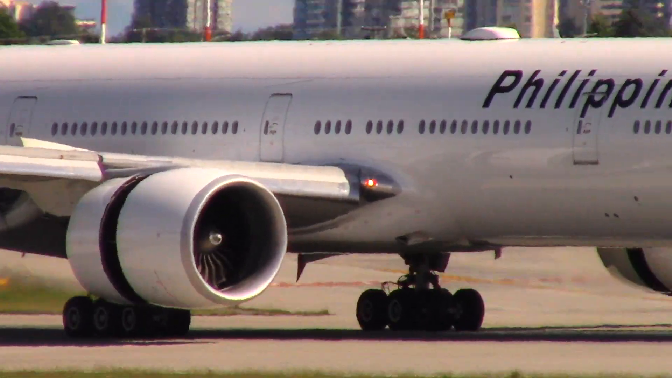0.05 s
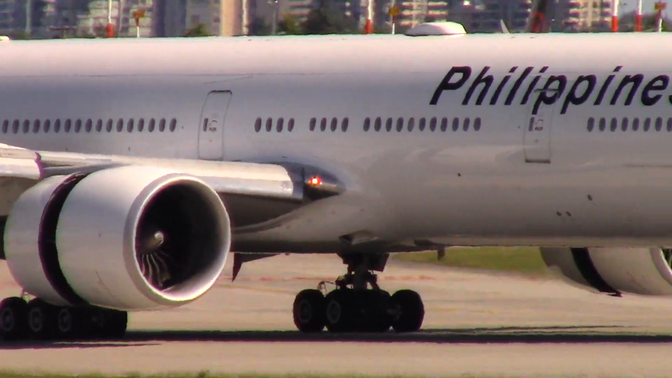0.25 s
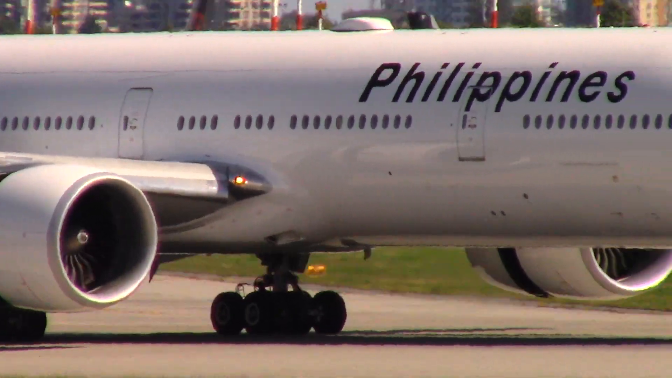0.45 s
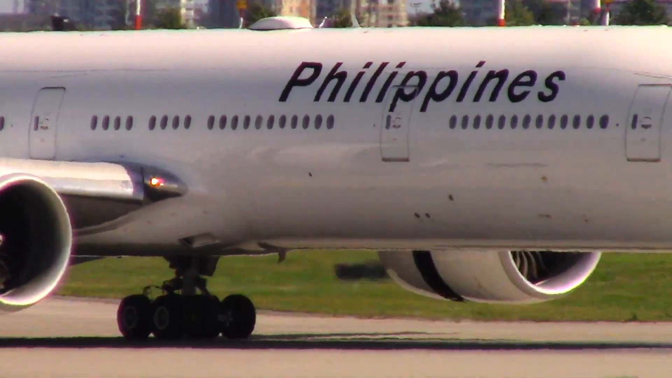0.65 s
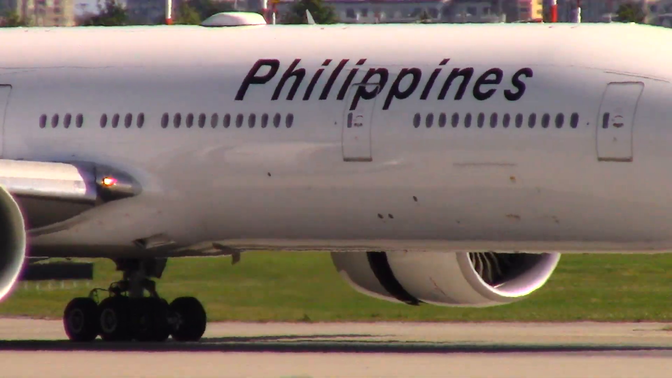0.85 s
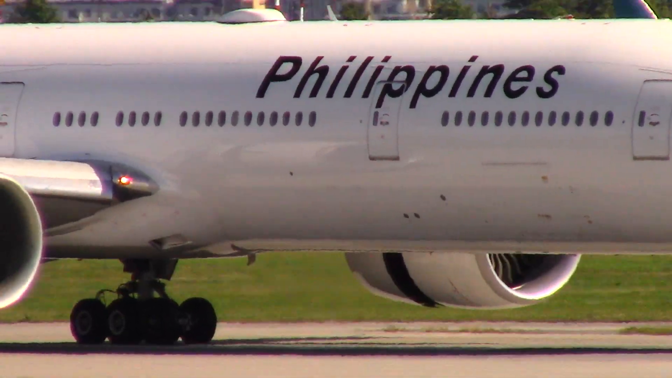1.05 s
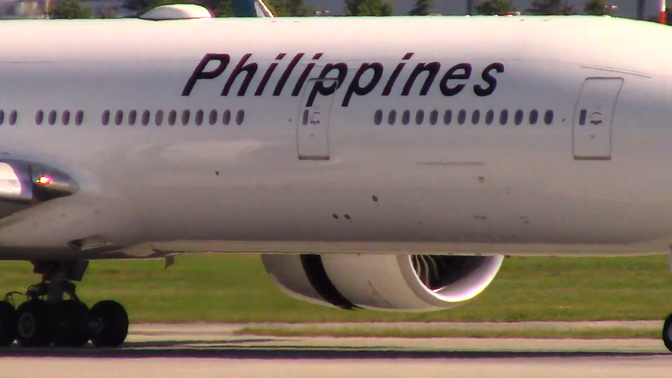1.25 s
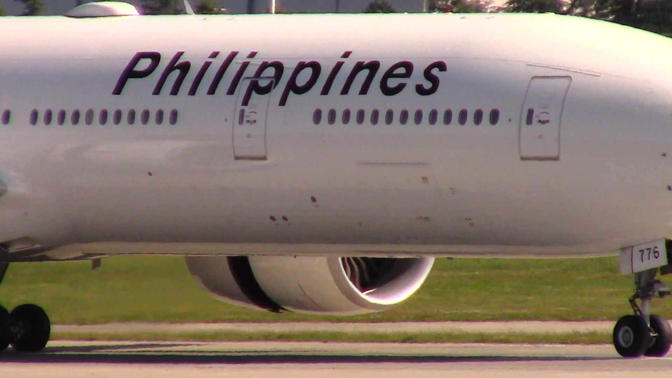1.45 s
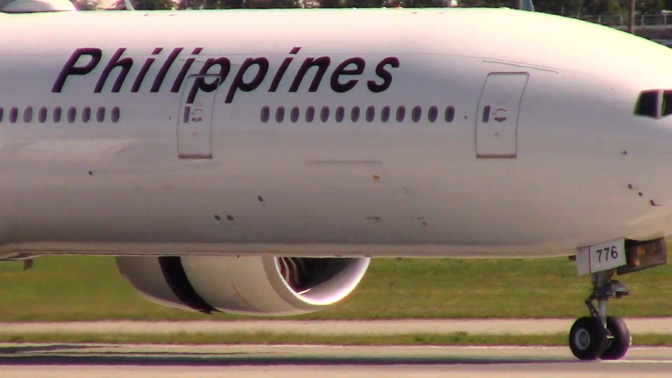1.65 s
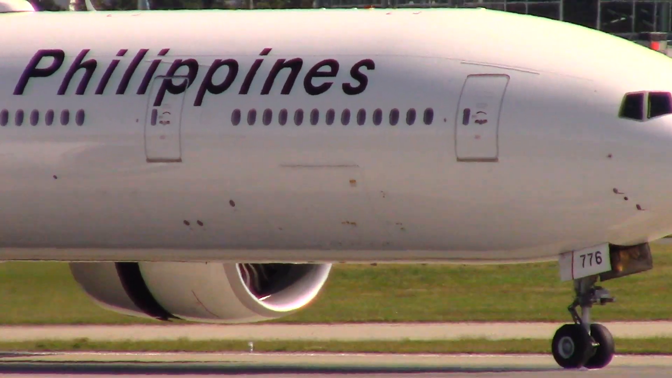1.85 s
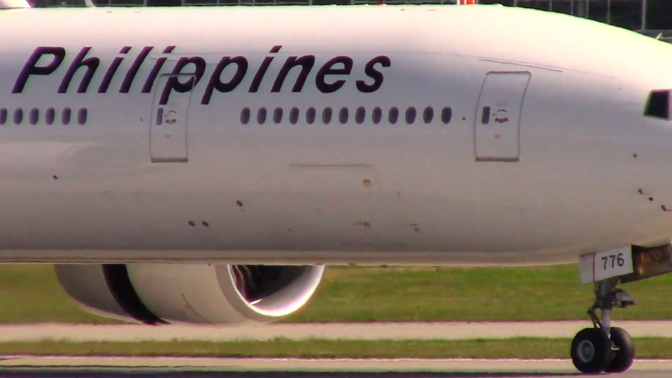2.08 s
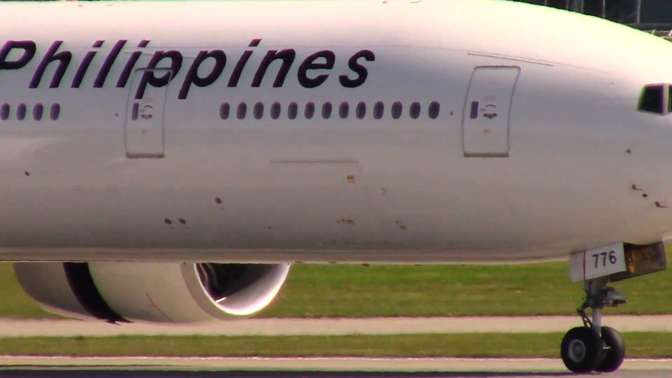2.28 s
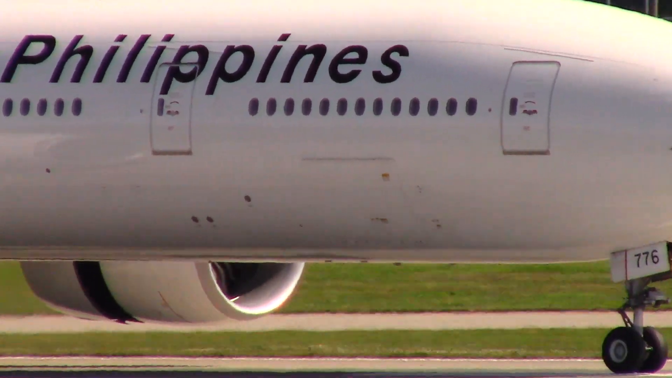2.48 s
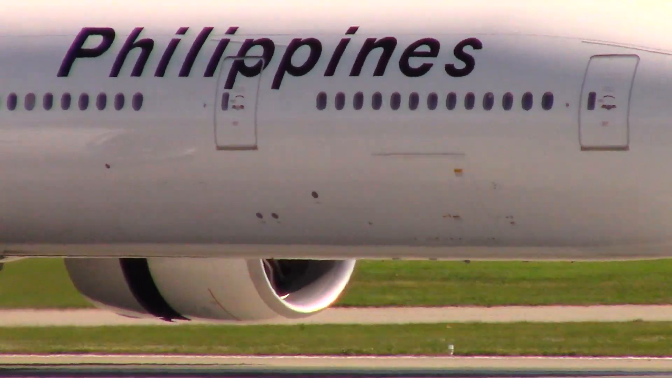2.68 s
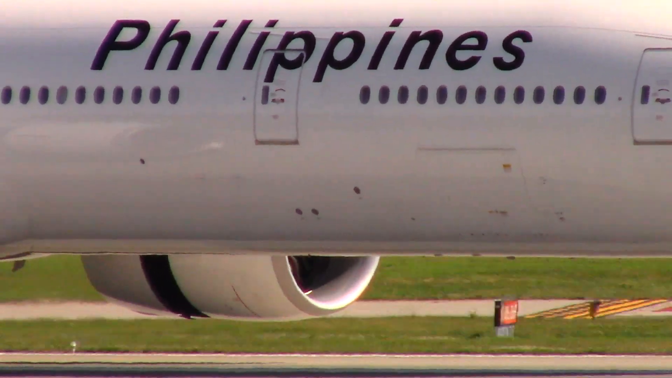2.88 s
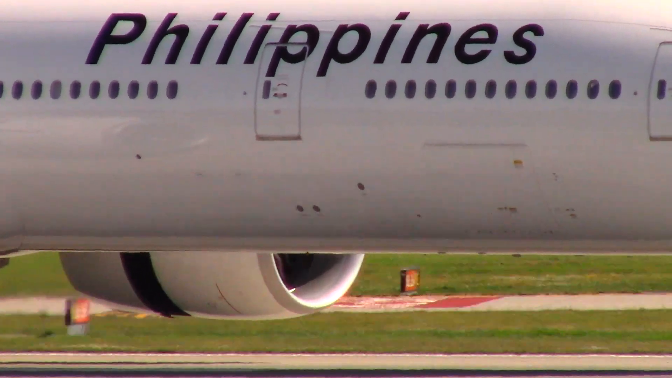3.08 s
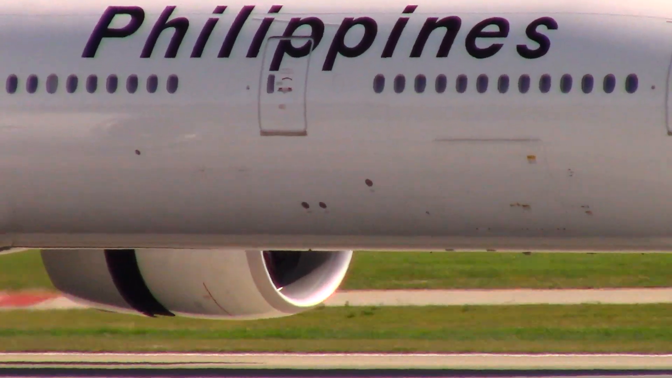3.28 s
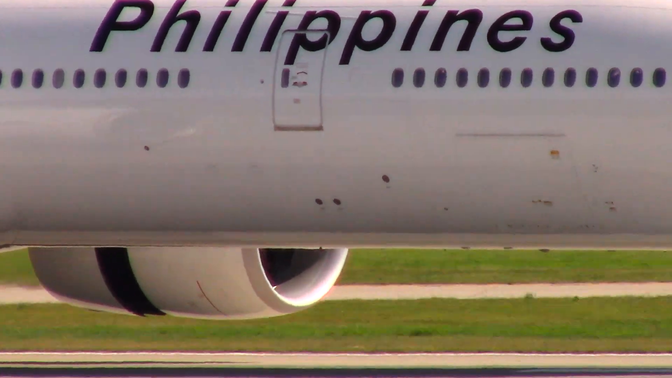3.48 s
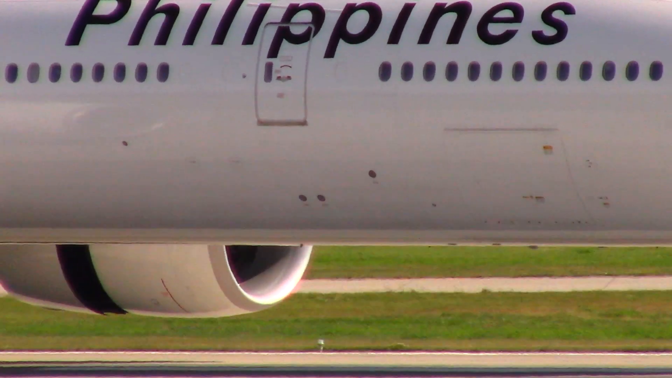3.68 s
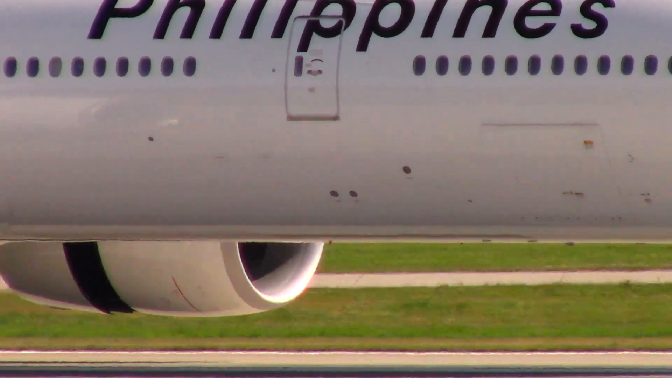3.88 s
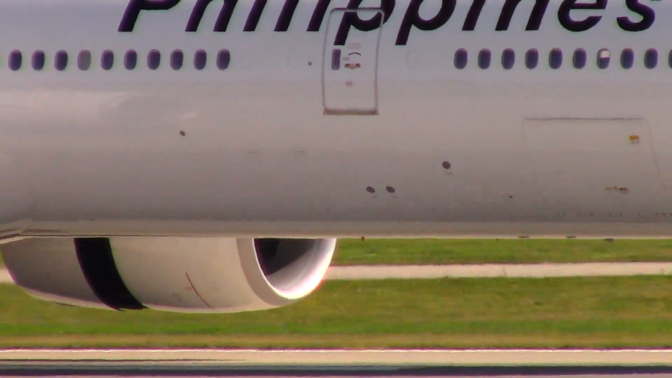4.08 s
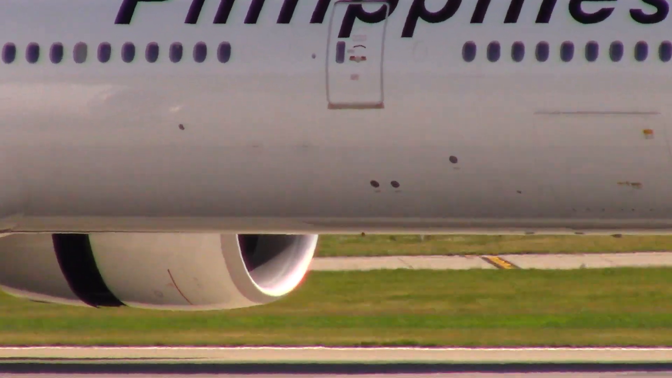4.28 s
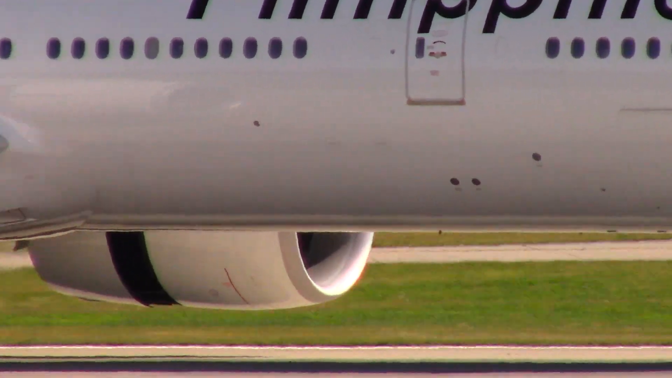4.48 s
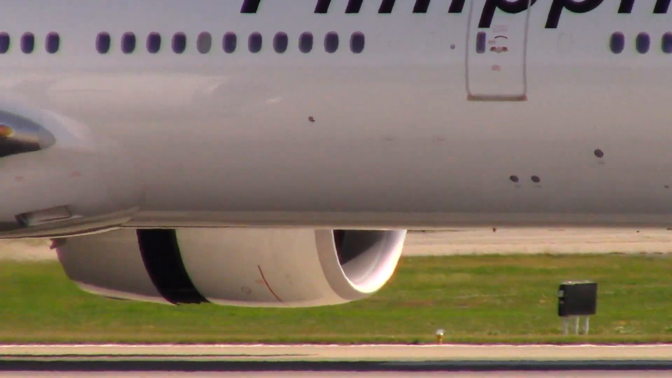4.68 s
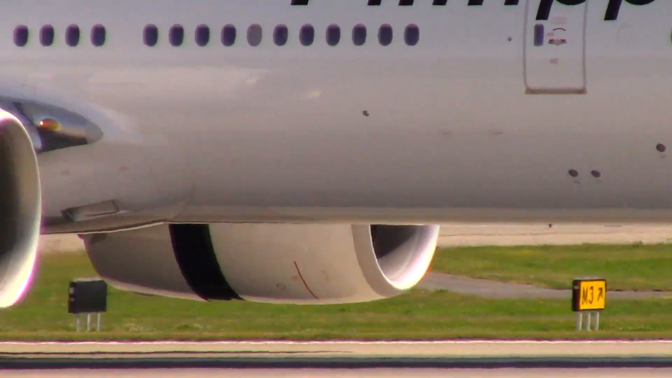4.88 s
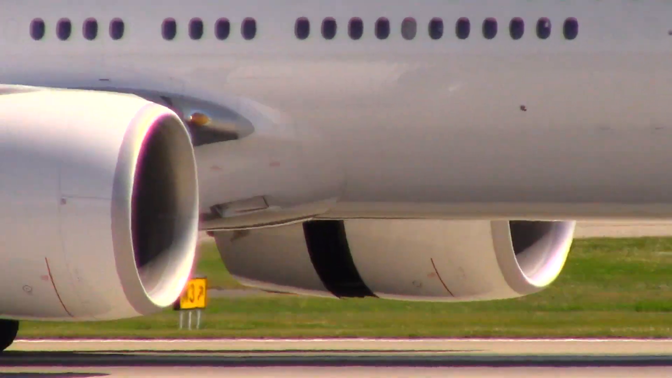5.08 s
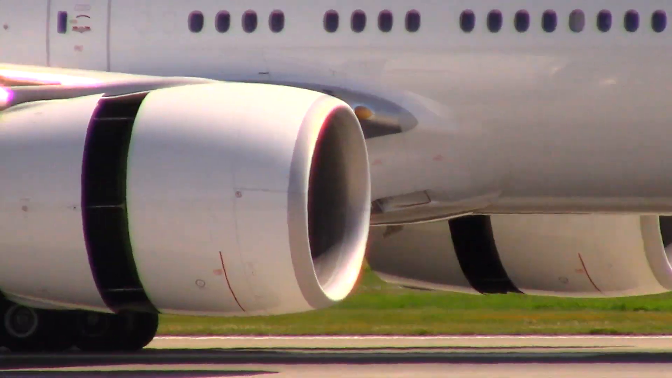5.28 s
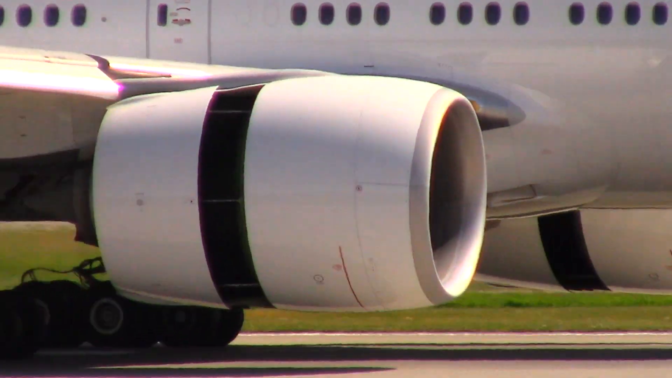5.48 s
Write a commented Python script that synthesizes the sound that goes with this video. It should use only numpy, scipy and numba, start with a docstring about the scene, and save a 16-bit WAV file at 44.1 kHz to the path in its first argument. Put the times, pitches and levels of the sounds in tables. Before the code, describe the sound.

A large jet airliner rolls past in reverse thrust, its breathy roar growing strong while wavering high whines sink and early wind buffeting dies away.

```python
"""Wind spits and flutters over a faint dull roar, which swells as a large twin jet rolls past in reverse thrust.
Roar: noise in flickering bands, with notches sliding down. Fans: three falling blade tones, part line, part
smear, with short clear swells. Wind: gusts and buffets of shaped noise on two microphone ports, early on only.
Port differences widen the treble; the input stage squashes the loudest peaks and a faint hiss lies below.
"""
import sys
import numpy as np
from scipy import signal
from scipy.fft import rfft, irfft
from scipy.io import wavfile
from scipy.ndimage import uniform_filter1d
from numba import njit

SR = 44100
rng = np.random.default_rng(int(sys.argv[2]) if len(sys.argv) > 2 else 0)


def dump(signal):
    """Clip the signal to [-1, 1] and save it as 16-bit WAV at the path in sys.argv[1]."""
    limited = np.clip(np.atleast_2d(signal).T, -1, 1)
    pcm = np.round(limited * 32767).astype(np.int16)
    wavfile.write(sys.argv[1], SR, pcm)


N = 244314  # samples
OPPOSITE = np.array([[1], [-1]])  # plus at one port, minus at the other


def undb(db):
    """Amplitude ratio of a level in dB."""
    return 10 ** (np.asarray(db) / 20)


def seconds():
    """Time of every sample."""
    return np.arange(N) / SR


def curves(table):
    """Columns of a table, after its time column, interpolated at every sample."""
    time_s, *columns = np.transpose(table)
    return [np.interp(seconds(), time_s, column) for column in columns]


def walk(rate_hz):
    """Random levels held 1 / rate_hz, smoothed twice over that time; standard deviation 1."""
    hold = int(SR / rate_hz)
    steps = np.repeat(rng.standard_normal(N // hold + 1), hold)
    smooth = uniform_filter1d(uniform_filter1d(steps, hold), hold)[:N]
    return smooth / smooth.std()


def coloured(colour):
    """Spectrum of a noise with the given colour, rms 1, and its frequencies."""
    hz = np.arange(N // 2 + 1) * SR / N + 1e-9
    at_hz, db = np.transpose(colour)
    gain = undb(np.interp(np.log(hz), np.log(at_hz), db))
    spectrum = rfft(rng.standard_normal(N)) * gain
    return spectrum / irfft(spectrum, N).std(), hz


def noise(colour):
    """Noise with the given colour, rms 1."""
    return irfft(coloured(colour)[0], N)


@njit
def svf(x, hz, width_hz):
    """State-variable band-pass with a moving centre, gain 1 there."""
    y, band, low = np.empty(len(x)), 0., 0.
    for i in range(len(x)):
        g, k = np.tan(np.pi * hz[i] / SR), width_hz / hz[i]
        v = (band + g * (x[i] - low)) / (1 + g * (g + k))
        band, low, y[i] = 2 * v - band, low + 2 * g * v, k * v
    return y


# jet noise spectrum: freq_hz, density_db_per_hz
JET_COLOUR = [(150, -59), (280, -50), (400, -31), (532, -16.5), (720, -12), (811, -5.5), (1000, -5),
              (1390, -0.5), (1750, 0), (2300, -3), (3400, -7.5), (4150, -9.5), (4450, -14.5), (4850, -17.5),
              (5300, -25), (6200, -27.5), (8500, -46), (12000, -85.5)]
# rumble gain, full below 495 Hz, none above 700 Hz: time_s, gain_db
RUMBLE_GAIN = [(0, -10), (.55, 1), (.65, -5), (.8, -5), (1.5, -1), (2.3, -3), (3, -3), (3.8, -2.5),
               (4.6, 3), (5.05, 1.5), (5.54, 10.5)]
# top gain, none below 5 kHz, full above 7.1 kHz: time_s, gain_db
SIZZLE_GAIN = [(0, 10.5), (.5, -7), (1.2, -4.5), (3, 0), (3.7, -1), (4.15, 4), (4.5, 2), (5.0, 4),
               (5.54, 5.5)]
# notch cut by the ground echo, before its wander: time_s, centre_hz, depth_0_to_1
GROUND_NOTCH = [(0, 790, .3), (2.1, 770, .4), (2.6, 700, .85), (4, 658, .9), (5.54, 620, .85)]
# two higher notches sliding down: time_s, low_hz, low_depth_0_to_1, high_hz, high_depth_0_to_1
SLIDING_NOTCHES = [(0, 2330, .3, 2850, .2), (1.6, 2310, .2, 2820, .2), (2.2, 2300, .5, 2780, .5),
                   (3.2, 2260, .55, 2680, .55), (4.2, 2230, .5, 2580, .4), (4.8, 2200, .1, 2550, .2),
                   (5.54, 2200, .1, 2550, .1)]
# fixed hollows of the body around the microphone: centre_hz, width_hz, depth_0_to_1
BODY_NOTCHES = [(4250, 140, 0.33), (5200, 300, 0.29)]
GROUND_WIDTH_HZ, SLIDING_WIDTH_HZ = 118.0, 150.0
TREBLE_HZ = 3460  # half the treble gain applies here


def roar(treble_db, shared_db=0.3, own_db=0.3):
    """Jet noise in overlapping half-octave bands; eddies on the way make each band flicker."""
    spectrum, hz = coloured(JET_COLOUR)
    (rumble_db,), (sizzle_db,) = curves(RUMBLE_GAIN), curves(SIZZLE_GAIN)
    shared_flicker, rumble_flicker = walk(11), walk(8)
    out = 0
    for centre_hz in 150 * 2 ** np.arange(0, 6.6, .5):
        octaves = np.log2(hz / centre_hz)
        share = np.cos(np.pi / 2 * np.clip(2 * octaves, -1, 1)) ** 2
        tilt = np.clip(np.log2(centre_hz / TREBLE_HZ) + .5, 0, 1.6)  # air takes the treble of far sound
        rumble_share = np.clip(2 * np.log2(700 / centre_hz), 0, 1)
        sizzle_share = np.clip(2 * np.log2(centre_hz / 5000), 0, 1)
        db = tilt * treble_db + shared_db * shared_flicker + own_db * walk(10)
        db = db + rumble_share * (rumble_db + 1.5 * rumble_flicker)
        db = db + sizzle_share * sizzle_db
        out = out + undb(db) * irfft(spectrum * share, N)

    ground_hz, depth = curves(GROUND_NOTCH)
    ground_hz = ground_hz * (1 + .015 * walk(9))
    depth = np.clip(depth * (.9 + .15 * walk(6)), 0, 1)
    out = out - depth * svf(out, ground_hz, GROUND_WIDTH_HZ)

    low_hz, low_depth, high_hz, high_depth = curves(SLIDING_NOTCHES)
    low_band = svf(out, low_hz, SLIDING_WIDTH_HZ)
    high_band = svf(out, high_hz, SLIDING_WIDTH_HZ)
    out = out - low_depth * low_band - high_depth * high_band
    for dip_hz, width_hz, dip_depth in BODY_NOTCHES:
        out = out - dip_depth * svf(out, np.full(N, 1. * dip_hz), 1. * width_hz)
    return out


# blade tones, falling as the engines slow and pass; level before fades: time_s, pitch_hz, level_db
NEAR_FAN = [(0, 3065, -44), (.35, 3052, -43), (.65, 3040, -43), (.85, 3032, -42), (1.15, 3010, -39),
            (1.3, 3000, -36), (1.8, 2958, -39), (2.5, 2895, -36), (3.0, 2845, -36), (3.3, 2812, -33),
            (3.7, 2780, -32), (3.9, 2750, -42)]
FAR_FAN = [(1.25, 2670, -44), (1.65, 2640, -44), (1.95, 2585, -46), (2.4, 2565, -39), (2.7, 2550, -35),
           (3.2, 2520, -33), (3.6, 2490, -32), (4.3, 2400, -33), (4.7, 2370, -40)]
# third, higher blade tone, falling from 3320 to 3000 Hz: time_s, pitch_hz, level_db
HIGH_FAN = [(1.22, 3320, -44), (1.28, 3310, -42), (1.6, 3290, -41), (1.9, 3250, -43), (2.3, 3200, -43),
            (3.15, 3100, -36), (3.3, 3020, -36), (3.4, 3000, -44)]
FADES_HZ, FADE_DB = 28, 5  # rate of fades, dB per standard deviation


def fan(table, direct):
    """A blade tone: a flickering direct share, the rest smeared into a band by many paths in unsteady air."""
    pitch_hz, level_db = curves(table)
    s = seconds()
    on = np.clip(np.minimum(s - table[0][0] + .07, table[-1][0] - s) / .07, 0, 1)
    phase = 2 * np.pi * np.cumsum(pitch_hz + 10 * walk(50)) / SR
    flicker = undb(5 * np.minimum(walk(35), 1) - 1)
    line = np.sqrt(2) * np.sin(phase) * flicker
    smear = svf(svf(rng.standard_normal(N), pitch_hz, 120.), pitch_hz, 120.)
    smear = smear / smear.std()
    fades_db = FADE_DB * np.minimum(walk(FADES_HZ), .5)
    tone = np.sqrt(direct) * line + np.sqrt(1 - direct) * smear
    return on * undb(level_db + fades_db) * tone


# clear swells of a fan tone, level before break-up: centre_s, pitch_hz, peak_db_rms, half_amplitude_width_s
TONE_SWELLS = [(.05, 3065, -38, .04), (.155, 3060, -38, .03), (.25, 3060, -37, .03), (.315, 3065, -35, .03),
               (.35, 3050, -32, .035), (.455, 3045, -33, .03), (.5, 3045, -38, .025),
               (.585, 3045, -33.5, .05), (.735, 3050, -34.5, .03), (.81, 3035, -30, .06),
               (.935, 3035, -34, .04), (1.05, 3025, -34.5, .03), (1.095, 3025, -31, .03),
               (1.13, 3005, -30.5, .035), (1.278, 3315, -29.5, .045), (1.35, 2995, -32.5, .06),
               (1.362, 3305, -36, .025), (1.435, 3005, -31.5, .04), (1.51, 2985, -33.5, .03),
               (1.615, 2970, -30, .03), (1.62, 2650, -33, .04), (1.685, 2980, -33, .025),
               (1.97, 2950, -31, .03), (2.07, 2935, -33, .03), (2.268, 2920, -33, .035),
               (2.473, 2900, -29, .035), (2.521, 2885, -29, .035), (2.542, 2555, -31, .035),
               (2.63, 2875, -31.5, .05), (2.706, 2550, -28.5, .025), (2.766, 2545, -31.5, .035),
               (2.885, 2850, -26.5, .045), (2.91, 2535, -26.5, .045), (3.046, 2530, -29, .045),
               (3.119, 2530, -28, .025), (3.195, 2820, -25, .06), (3.353, 2815, -27.5, .025),
               (3.373, 2510, -26, .03), (3.454, 2800, -26, .05), (3.6, 2510, -27, .03),
               (3.86, 2520, -27, .04), (4.084, 2440, -27, .035), (4.19, 2400, -28.5, .02)]


def blips():
    """Short swells of a blade tone, wavering in pitch and broken up by eddies."""
    out, s = np.zeros(N), seconds()
    waver = 2 * np.pi * np.cumsum(22 * walk(90)) / SR
    for centre_s, pitch_hz, peak_db, width_s in TONE_SWELLS:
        swell = np.cos(np.pi / 2 * np.clip((s - centre_s) / (.72 * width_s), -1, 1))
        tone = np.sqrt(2) * np.sin(2 * np.pi * pitch_hz * s + waver)
        out += undb(peak_db) * swell * tone
    return out * undb(3 * np.minimum(walk(110) - .3, 0))


# port difference of the engines, before the bearing gain: freq_hz, gain_db, phase_deg
PORT_DIFFERENCE = [(1900, -50, 150), (2300, -27, 130), (2900, -21, 65), (3900, -23, -40), (4650, -16, -135),
                   (5400, -10, -185), (6000, -11, -208), (6700, -8, -240), (7300, -12, -280),
                   (8000, -26, -300), (12000, -50, -300)]
# gain of that difference, growing as the jet moves off axis: time_s, gain_db
BEARING_GAIN = [(0, -9), (1.5, -4.5), (3.2, -1.5), (5.54, 2)]


def port_gap(x):
    """The part of a sound that the body adds at one port and takes from the other."""
    at_hz, gain_db, phase_deg = np.transpose(PORT_DIFFERENCE)
    hz = np.arange(N // 2 + 1) * SR / N
    gain = undb(np.interp(hz, at_hz, gain_db, left=-80))
    turn = np.exp(1j * np.radians(np.interp(hz, at_hz, phase_deg)))
    return undb(curves(BEARING_GAIN)[0]) * irfft(rfft(x) * gain * turn, N)


# roar opposed between the ports: freq_hz, density_db_per_hz
WIDE_ROAR_COLOUR = [(500, -45), (1000, -35), (1500, -40), (1880, -22.5), (2330, 12.5), (2760, 9.5),
                    (4400, 1.5), (5000, -1), (6300, -5), (8000, -14.5), (11000, -41), (16000, -76.5)]
WIDE_DB = -29  # against the roar level


def wide_roar(level_db, treble_db):
    """Separate treble noise that follows the roar and its treble, for opposite signs at the ports."""
    return undb(level_db + WIDE_DB + treble_db) * noise(WIDE_ROAR_COLOUR)


WIND_ALIKE = 0.96  # power share common to both ports


def ports(colour):
    """Noise that is partly common to the two ports."""
    both, apart = noise(colour), noise(colour)
    return np.sqrt(WIND_ALIKE) * both + np.sqrt(1 - WIND_ALIKE) * apart * OPPOSITE


# wind spectra: freq_hz, density_db_per_hz
GUST_COLOUR = [(100, -59), (200, -29.5), (350, -16.5), (590, -6), (900, -6.5), (1400, -13.5), (2500, -36.5),
               (6000, -99)]
SPIT_COLOUR = [(100, -66), (200, -28), (350, -26), (600, -3), (1200, 3.5), (1800, -3), (3100, -7.5),
               (4500, -29), (8000, -76)]
# gusts, level before flutter: start_s, length_s, level_db
GUST_EVENTS = [(-.05, 0.397, -40), (0.374, 0.18, -40), (0.694, 0.37, -43.5), (1.08, 0.5, -47),
               (1.705, 0.422, -44), (2.204, 0.05, -59), (2.457, 0.05, -55)]
# sharp buffets, peak before spitting, reached at half length: start_s, peak_db, length_s
BUFFET_EVENTS = [(0.0, -30.5, 0.032), (0.078, -31.5, 0.039), (0.157, -37, 0.016), (0.21, -31, 0.063),
                 (0.251, -47, 0.0097), (0.31, -44, 0.016), (0.42, -30.5, 0.022), (0.462, -27, 0.012),
                 (0.505, -27.5, 0.015), (0.536, -49, 0.0097), (0.68, -40, 0.012), (0.812, -27, 0.009),
                 (0.871, -28, 0.021), (0.969, -24, 0.027)]
GUST_RISE_S, GUST_FALL_S = 0.025, 0.03  # linear rise, decay time constant


def wind(flutter_db=1.0, spit_db=3.0):
    """Turbulent air on the ports: dull fluttering gusts and brighter, spitting buffets."""
    gust_size, buffet_size, s = 0, 0, seconds()
    for start_s, length_s, level_db in GUST_EVENTS:
        rise = np.clip((s - start_s) / GUST_RISE_S, 0, 1)
        fall = np.exp(-np.maximum(s - start_s - length_s, 0) / GUST_FALL_S)
        gust_size = gust_size + undb(level_db) * rise * fall
    for start_s, peak_db, length_s in BUFFET_EVENTS:
        u = np.clip((s - start_s) / length_s, 0, 30)
        buffet_size = buffet_size + undb(peak_db) * np.e * 2 * u * np.exp(-2 * u)
    gusts = gust_size * undb(flutter_db * walk(32.8)) * ports(GUST_COLOUR)
    buffets = buffet_size * undb(spit_db * walk(300)) * ports(SPIT_COLOUR)
    return gusts + buffets


# roar swelling and fading through unsteady air, before band gains: time_s, level_db
ROAR_LEVEL = [(0, -31), (.3, -32.5), (.8, -28), (1.1, -24.5), (1.45, -21.5), (1.78, -26.5), (2.1, -24),
              (2.45, -22), (2.53, -20), (2.58, -21.5), (3.12, -19), (3.17, -16.5), (3.23, -19), (3.28, -16),
              (3.32, -18.5), (3.42, -16), (3.48, -17), (3.6, -16), (3.8, -15), (3.95, -17), (4.05, -16),
              (4.1, -15), (4.17, -16.5), (4.21, -17.5), (4.27, -16.5), (4.31, -18.5), (4.5, -18.5),
              (4.72, -22), (4.84, -18), (4.98, -17.5), (5.05, -16.5), (5.15, -18), (5.24, -18),
              (5.35, -19.5), (5.54, -19)]
# treble opening as the engines near, before the tilt over bands: time_s, gain_db
TREBLE_GAIN = [(0, -6.5), (.6, -0.5), (1.0, -1.5), (1.22, -3.5), (1.27, 0.5), (1.42, -2), (1.5, -3),
               (1.8, -1), (2.55, -0.5), (2.68, -1.5), (3.2, -1), (4.4, -1), (4.8, 0.5), (5.54, 0)]


def scene():
    """Engines nearly ahead, a little width in the treble, wind on top."""
    (level_db,), (treble_db,) = curves(ROAR_LEVEL), curves(TREBLE_GAIN)
    fans = fan(NEAR_FAN, .2) + fan(FAR_FAN, .1) + fan(HIGH_FAN, .2) + blips()
    engines = undb(level_db) * roar(treble_db) + fans
    side = wide_roar(level_db, treble_db) + port_gap(engines)
    return engines + side * OPPOSITE + wind()


# microphone noise spectrum: freq_hz, density_db_per_hz
HISS_COLOUR = [(20, -4.5), (100, -8), (300, -10.5), (1000, -45), (6000, -2.5), (10000, -9), (16000, -19)]
HISS_DB = -62  # rms before its slow waver and the low-pass
KNEE, SLOPE = 0.32, 0.6  # amplitude, share of the excess passed
SOFT_HZ, TOP_HZ = 13300, 15700  # gentle roll-off, steep cut


def record(dry):
    """Input stage squashes mid-signal peaks, rolls off the treble, adds hiss separate left and right."""
    mid = dry.mean(axis=0)
    excess = mid - np.clip(mid, -KNEE, KNEE)
    bent = dry - (1 - SLOPE) * excess
    bent = signal.lfilter(*signal.butter(1, SOFT_HZ, fs=SR), bent)
    waver = undb(.8 * walk(9))
    hiss = undb(HISS_DB) * waver * np.array([noise(HISS_COLOUR) for _ in range(2)])
    low_pass = signal.ellip(8, .2, 70, TOP_HZ, fs=SR, output="sos")
    return signal.sosfilt(low_pass, bent + hiss)


dry = scene()
out = record(dry)
dump(out)
```